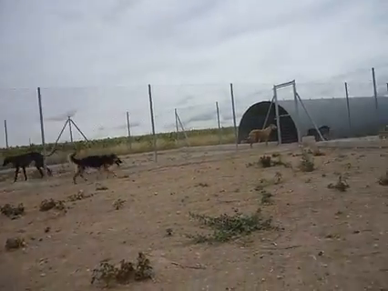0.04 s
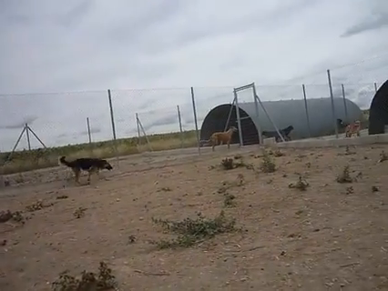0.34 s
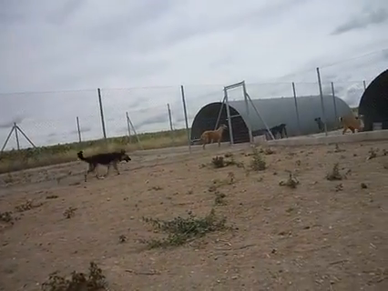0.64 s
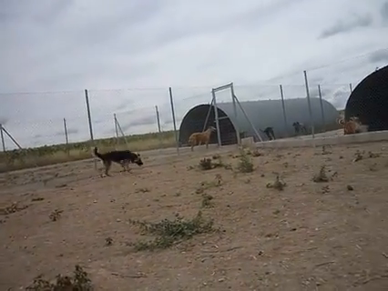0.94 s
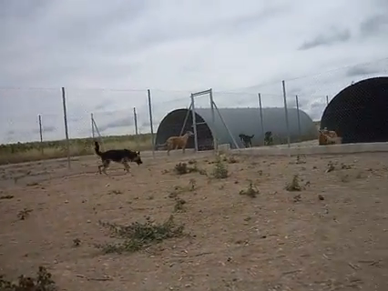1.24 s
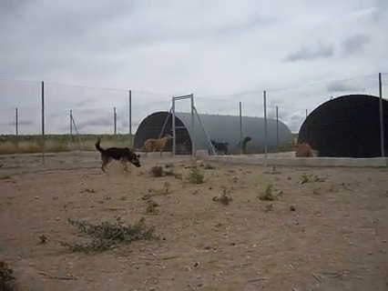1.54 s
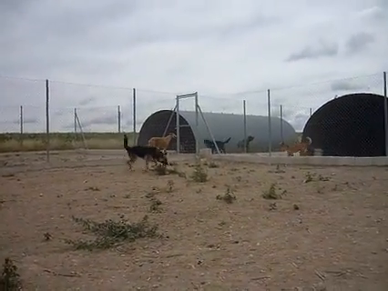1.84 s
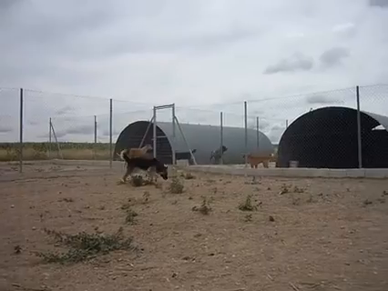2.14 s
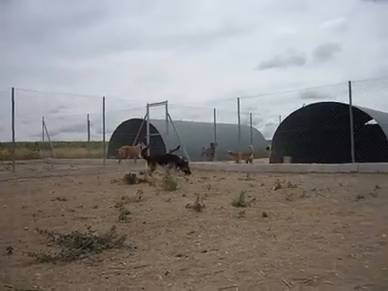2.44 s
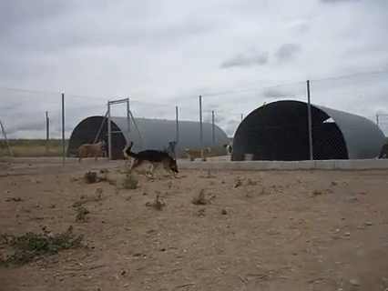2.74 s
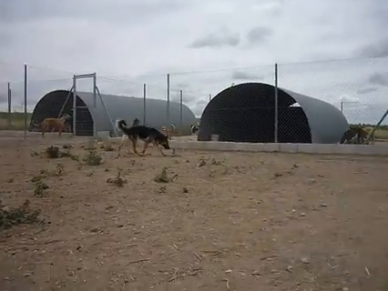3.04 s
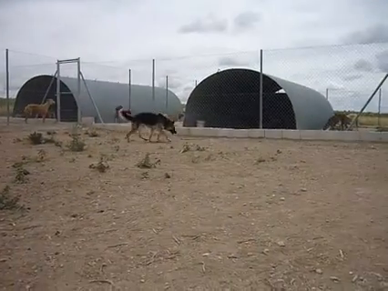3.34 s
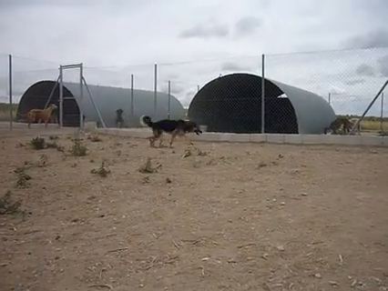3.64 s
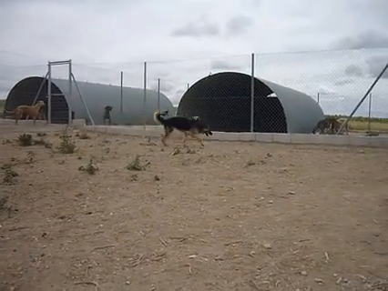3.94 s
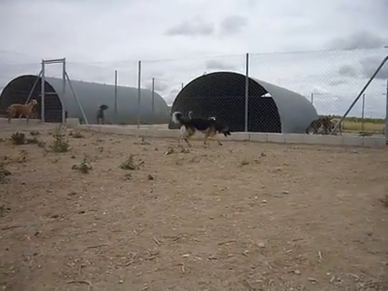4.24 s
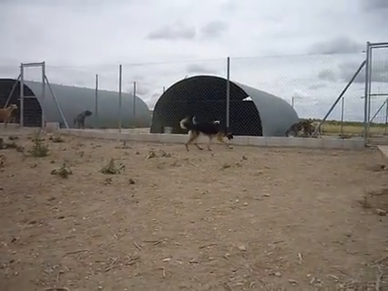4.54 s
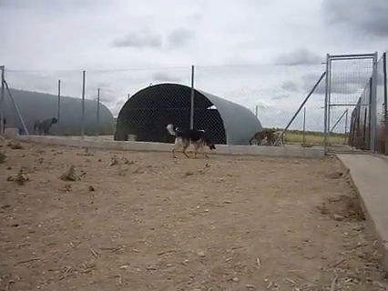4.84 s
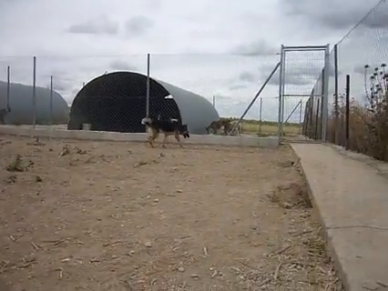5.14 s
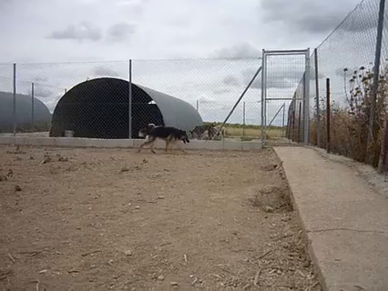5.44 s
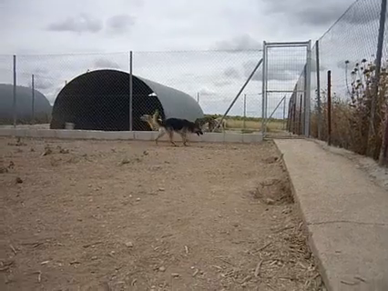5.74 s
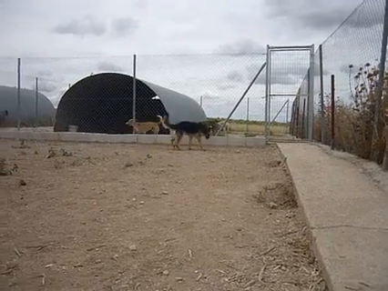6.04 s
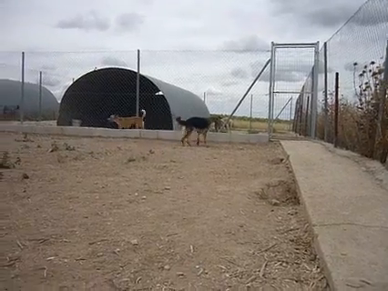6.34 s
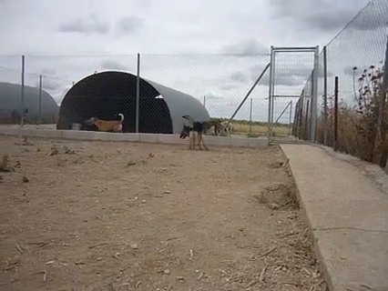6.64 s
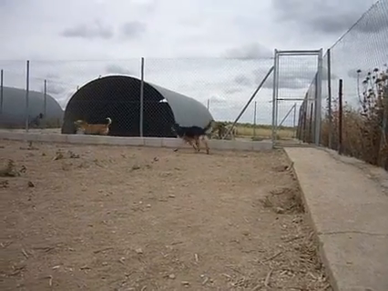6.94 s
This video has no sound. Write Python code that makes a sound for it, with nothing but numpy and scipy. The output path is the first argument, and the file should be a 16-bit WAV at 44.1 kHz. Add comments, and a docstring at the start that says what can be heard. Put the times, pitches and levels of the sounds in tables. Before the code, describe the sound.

A nearby dog yaps repeatedly outdoors while others answer with lower barks and distant yelps over faint hiss.

```python
"""An open dirt yard with metal shelters, across which dogs call. A near dog yaps in clean arches of pitch,
a second answers lower, a big one gives two gruff barks, another yelps far off and others whine faintly.
Each voice is a source and a filter: vocal folds and puffs of breath excite the resonances of the throat.
The shelters throw the near calls back. Under them lie faint outdoor air, microphone hiss, two scuffs on
the dirt and three soft bumps on the camera."""
import sys
import numpy as np
from scipy import signal
from scipy.fft import rfft, irfft
from scipy.io import wavfile

SR = 44100
rng = np.random.default_rng(int(sys.argv[2]) if len(sys.argv) > 2 else 0)


def unload_audio(sound):
    """Save the sound as a 16-bit wav file, at the path given as the first command line argument."""
    columns = np.transpose(np.atleast_2d(sound))
    # keep every value between -1 and 1, then stretch to whole-number steps
    steps = np.round(np.clip(columns, -1, 1) * 32767)
    wavfile.write(sys.argv[1], SR, steps.astype(np.int16))


N = 317520

# spectrum of the steady hiss: f/Hz, relative level/dB
HISS_SPECTRUM = [(30, -15), (70, -13), (110, -5.5), (200, -2.5), (400, -5), (700, -7), (1200, -13),
                 (2000, -15.5), (3200, -19), (4800, -23), (6500, -22.5), (8400, -27.5)]
# bumps on the camera: t/s, f/Hz, level/dB, decay time/s
CAMERA_BUMPS = [(3.276, 140, -40, .0056), (3.703, 130, -43, .0093), (6.792, 168, -40, .011)]
# scuffs on the dirt: t/s, duration/s, level/dB
DIRT_SCUFFS = [(6.081, 0.114, -60), (6.174, 0.064, -61)]
# reflections from ground, wall and shelters: delay/s, relative level/dB
REFLECTIONS = [(0.0093, -34), (.027, -16.5), (.066, -19.5), (.081, -30.5)]
# their gain as the camera turns toward the big shelter: t/s, gain/dB
REFLECTION_GAIN = [(0, 2.5), (3, -4), (4.2, -2.5), (4.55, 2.5), (6, 2)]
# throat responses of the whining, yelping, big and near dogs, the first two dulled by distance:
# f/Hz, gain/dB
WHINE_TRACT = [(200, -16), (350, -8), (700, -16.5), (2000, -43), (8000, -66)]
YELP_TRACT = [(250, -44), (450, -9.5), (620, 6), (780, 8), (980, 1), (1200, -15), (1550, -19), (2000, -28),
              (3000, -43), (4100, -27), (5000, -49), (8000, -59.5)]
GRUFF_TRACT = [(200, -15), (340, 15.5), (500, 12), (680, 8.5), (880, 9.5), (1150, -3.5), (1500, -8.5),
               (2000, -24.5), (2600, -11), (3300, -32), (4700, -30), (5700, -23.5), (8000, -52.5)]
YAP_TRACT = [(400, 4), (800, 15.5), (1300, 5.5), (1750, 0), (2050, -5), (2350, -8), (2950, -10.5),
             (3300, -12), (3700, -8.5), (4050, -15), (4450, -14), (4800, -17.5), (5500, -16.5),
             (6500, -23.5), (8000, -31)]
# filter for breath passing the teeth: f/Hz, gain/dB
TEETH_RESPONSE = [(300, -60), (2200, -29.5), (3200, -17), (4200, -5), (4850, -1), (5500, 5), (6300, -4.5),
                  (8000, -1.5)]
# distant whines: start/s, end/s, first pitch/Hz, last pitch/Hz, level/dB
FAR_WHINES = [(.17, .42, 305, 350, -51), (.45, .7, 255, 300, -55), (.93, 1.17, 285, 345, -54),
              (1.97, 2.13, 325, 355, -54)]
# far yelps: start/s, break/s, end/s, cry pitch/Hz, note pitch/Hz, cry glide/fraction of pitch,
# cry level/dB, cry fade/dB (negative swells), note level/dB, roughness (0-1), jaw resonance/dB,
# accent time/s, accent/dB, huff level/dB
FAR_YELPS = [(0.089, 0.161, .233, 474, 388.5, 0.077, -45, -2, -46, 0.34, 4, .125, 2, -58),
             (0.413, 0.507, .6, 367.7, 371.4, -0.0048, -45, 1, -48.5, 0.44, -15, .5, 5, -62),
             (1.072, 1.138, 1.18, 487, 385, -.019, -43, -1, -41.5, 0.31, -8, 1.1, 4, -58),
             (1.613, 1.661, 1.715, 470.4, 397, 0.014, -42.5, 5.5, -44.5, 0.16, -10, 1.622, 1, -61),
             (1.972, 2.026, 2.12, 441, 393.4, -0.077, -47.5, -2.5, -39, 0.31, 8, 1.988, 1.7, -52),
             (2.415, 2.502, 2.551, 465, 362.4, 0.024, -48.5, -0.5, -42, 0.69, 5, 2.455, 1.9, -62),
             (2.844, 2.93, 2.991, 460, 376, 0.035, -49.5, -8.5, -38, 0.49, 6.5, 2.882, 6, -60.5),
             (3.262, 3.335, 3.398, 437, 379, -0.027, -42, 3.5, -45, 0.38, 7.5, 3.342, 4.5, -54.5),
             (4.29, 4.334, 4.415, 424, 403.3, -0.03, -55.5, -11, -41.5, 0.13, 6.5, 4.385, 6.5, -58),
             (4.683, 4.761, 4.821, 466.5, 387.5, 0.046, -39, 7.5, -44.5, 0.15, -3, 4.704, 7, -52.5),
             (5.137, 5.233, 5.281, 460.6, 389.5, 0.067, -45.5, 3.5, -48, 0.4, 6.5, 5.18, 2.5, -57),
             (5.625, 5.686, 5.722, 405, 384.4, -0.0082, -54, -10, -43, .45, 15, 5.703, 3, -53.5),
             (6.932, 6.987, 7.09, 450, 388, 0.015, -64, -7, -55, 0.83, 23.5, 7.02, 1, -62),
             (7.111, 7.141, 7.22, 420, 310.3, 0, -52, 5, -49.5, .88, 16, 7.18, 0, -60)]
# gruff barks, one path of points each: t/s, pitch/Hz, level/dB, jaw resonance/dB
GRUFF_PATHS = [
    [(1.236, 402, -54, 5), (1.25, 409.6, -46, 9), (1.257, 423.3, -35, 3), (1.286, 417, -34.5, 5.5),
     (1.297, 409, -45, 10.5), (1.31, 397.3, -37, 4), (1.335, 386, -36, 1.5), (1.355, 331, -38, -5),
     (1.378, 320, -47, -10)],
    [(1.738, 449.4, -53, 8), (1.765, 493.6, -40.5, 12), (1.78, 505, -35.5, 5), (1.796, 502, -27.5, -0.5),
     (1.826, 463.7, -30.5, 1), (1.836, 432, -41.5, -3), (1.848, 384, -35, -10), (1.864, 362, -37, -22),
     (1.876, 352, -46.5, -22), (1.895, 320, -58, -21)],
]
# near yaps: top of the arch/s, lead-in/s, top pitch/Hz, rise/s, fall/s, base roughness (0-1),
# fundamental/dB, second harmonic/dB, its dip/dB, overtones/dB, their edge above 2 kHz/dB,
# edge fade/(dB/s), muzzle ring/dB, shrill resonance/dB, jaw ring on the climb/dB, rising flare/dB,
# falling flare/dB, pop/dB, hiss/dB
NEAR_YAPS = [(.752, 0.096, 583.4, 0.094, 0.085, 0.32, -37, -42, 7, -52, 7, -7.5, -4.5, -5, 7, 8, 10, 1.5, -57.5),
             (1.069, 0.085, 577.4, 0.099, 0.08, 0.32, -33.5, -41.5, 6.5, -52.5, 0, 79, 4, -2, 9.5, 5.5, 2, 7, -67),
             (1.275, 0.068, 446.4, .17, 0.22, 0.24, -38.5, -42.5, 0, -56.5, -5, 47, -12.5, 10.5, 7.5, -3, 1, 12, -61),
             (1.382, 0.064, 585.4, .1, .082, 0.32, -34, -41.5, 11, -55.5, -1.5, 109, 0.5, 1, 9, 9, -1, 2, -63.5),
             (1.59, .056, 437, .16, 0.17, 0.38, -41.5, -46, -11.5, -58, -17, 43, 2, 18.5, 7, 0, -3.5, 6, -70.5),
             (2.277, 0.1, 615.5, 0.11, 0.085, 0.3, -34, -39.5, 1.5, -53.5, 0.5, 69, 2, 1, 7, 9, 3, -7, -61.5),
             (2.591, 0.084, 584, 0.1, 0.092, 0.26, -35, -43, 4.5, -53.5, -1.5, 84, 2.5, 7, 10, 4.5, 3.5, 5, -63.5),
             (2.981, .075, 586, 0.12, .088, .2, -33, -42.5, 6, -54, -0.5, 77, 4, 11.5, 8, 7, -1, 4.5, -56),
             (3.19, .062, 459.5, .1, 0.216, 0.25, -36.5, -44, -7, -51.5, -5, 40, -12, 5, 3.5, 4, 6, 3, -64.5),
             (3.648, 0.05, 439, .1, 0.23, 0.14, -41.5, -42, 0.5, -51.5, -10, 30.5, 1, 17, 7.5, 2, 3.5, 8, -65),
             (4.128, .087, 614.5, 0.099, 0.075, 0.12, -38, -39, -.5, -46, -4, 15, 8.5, 5, 7, 9.5, 11, 0.5, -54.5),
             (4.521, 0.094, 581, .11, 0.073, 0.08, -35, -38, -2, -49.5, -1, 40, 6.5, 3, 4.5, 9.5, 3, 3, -62.5),
             (5.769, 0.084, 575, 0.088, 0.078, 0.2, -42, -43, 0, -50.5, 1.5, 23, -2, 0, 6, 8, 13.5, -4, -57)]

# resonances: centre/Hz, width/Hz
LOW_THROAT, HOLLOW, HUFF = (770, 70), (1780, 150), (1270, 320)
OPEN_JAW, HALF_OPEN_JAW = (1850, 485), (2120, 330)
MUZZLE_RING, MUZZLE_RASP, MUZZLE_SHRILL = (3660, 200), (5300, 940), (5600, 900)


def gain_of(db):
    """Amplitude ratio of a level in decibels."""
    return 10 ** (np.asarray(db) / 20)


def unit_rms(x):
    """Normalisation to unit mean power."""
    return x / np.sqrt(np.mean(x ** 2) + 1e-20)


def hump(x, centre, width):
    """Gaussian curve, one at its centre."""
    return np.exp(-((x - centre) / width) ** 2)


def response(spectrum, hz):
    """Gain of a (f/Hz, gain/dB) curve, interpolated in log frequency."""
    f, db = np.transpose(spectrum)
    return gain_of(np.interp(np.log(hz + 1), np.log(f + 1), db))


def coloured(x, spectrum):
    """Linear filtering by a (f/Hz, gain/dB) curve."""
    return irfft(rfft(x) * response(spectrum, np.fft.rfftfreq(len(x), 1 / SR)), len(x))


def band(x, centre_hz, width_hz):
    """Band-pass filtering: the part of x inside one resonance."""
    return irfft(rfft(x) * hump(np.fft.rfftfreq(len(x), 1 / SR), centre_hz, width_hz), len(x))


def wander(size, hz):
    """Random modulation: noise of about unit rms, low-passed at hz."""
    padded = size + SR // 4
    f = np.fft.rfftfreq(padded, 1 / SR)
    return unit_rms(irfft(rfft(rng.standard_normal(padded)) / (1 + (f / hz) ** 4)))[:size]


def swelled(x, rise_s, fall_s):
    """Amplitude envelope with a quarter-sine attack and release."""
    t = np.arange(len(x)) / SR
    attack = np.sin(np.pi / 2 * np.minimum(t / rise_s, 1))
    release = np.sin(np.pi / 2 * np.minimum(t[::-1] / fall_s, 1))
    return x * attack * release


def add(mix, start_s, sound):
    """Superposition of a sound on the mix."""
    part = mix[round(start_s * SR):][:len(sound)]
    part += sound[:len(part)]


def air(hiss_db=-53.5):
    """Broadband noise: steady hiss, and a low murmur of wind that swells a little and slowly drops."""
    hiss = gain_of(hiss_db) * unit_rms(coloured(rng.standard_normal(N), HISS_SPECTRUM))
    wind_spectrum = [(40, -32.5), (150, -4.5), (280, 2.5), (600, -10.5), (2000, -47), (8000, -68)]
    wind = unit_rms(coloured(rng.standard_normal(N), wind_spectrum))
    trend_db = np.interp(np.arange(N) / SR, [0, 2, 4, 7.2], [-64, -59.5, -67.5, -68.5])
    return hiss + wind * gain_of(trend_db + 2.5 * wander(N, 5))


def bumps():
    """Damped oscillation: each knock excites one low mode of the camera body."""
    out, t = np.zeros(N), np.arange(SR // 10) / SR
    for start, hz, db, decay in CAMERA_BUMPS:
        add(out, start, gain_of(db) * np.sin(2 * np.pi * hz * t) * np.exp(-t / decay))
    return out


def scuffs(grains_per_s=1500):
    """Shot noise: grit crunches underfoot as a train of random impulses."""
    out = np.zeros(N)
    for start, duration, db in DIRT_SCUFFS:
        size = round(duration * SR)
        grit = rng.standard_normal(size) * (rng.random(size) < grains_per_s / SR)
        crunch = unit_rms(band(grit, centre_hz=1800, width_hz=1800))
        add(out, start, gain_of(db) * swelled(crunch, rise_s=.038, fall_s=.04))
    return out


def reverberation(x, t60, dull_hz, taps_per_s=2500):
    """Diffuse reflection from fences and sheds: sparse, dull echoes of random sign decay exponentially."""
    t = np.arange(SR) / SR
    taps = rng.choice([-1., 1.], SR) * (rng.random(SR) < taps_per_s / SR)
    taps *= (t > .006) * gain_of(-60 * t / t60)
    pole = np.exp(-2 * np.pi * dull_hz / SR)
    tail = signal.lfilter([1 - pole], [1, -pole], taps / np.linalg.norm(taps))
    return signal.fftconvolve(x, tail)[:N]


def echoes(x):
    """Specular reflection: hard faces around the yard return delayed copies, the middle tones best."""
    out = np.zeros(N)
    for delay, db in REFLECTIONS:
        add(out, delay, gain_of(db) * x)
    out *= gain_of(np.interp(np.arange(N) / SR, *np.transpose(REFLECTION_GAIN)))
    return coloured(out, [(300, 2.5), (600, 4.5), (1150, 0), (1750, 4), (2600, -7), (6000, -17)])


def folds(hz, rough, tract, jitter, jitter_hz):
    """Glottal source: jittered harmonics, their frequencies, and air puffed once a cycle into the tract."""
    k = np.arange(1, 22)[:, None]
    cycles = np.cumsum(hz * (1 + jitter * rough * wander(len(hz), jitter_hz))) / SR
    puffs = (1 + 1.2 * np.cos(2 * np.pi * cycles)) * rng.standard_normal(len(hz))
    harmonics = np.sqrt(2) * np.cos(2 * np.pi * k * cycles + np.sqrt(k) * np.pi)
    breath = unit_rms(coloured(puffs, [(100, -44), (250, -21)] + list(tract[1:])))
    return harmonics, k * hz, breath


def call(path, tract):
    """Source-filter voice along a path of t/s, pitch/Hz, level/dB, roughness (0-1), jaw resonance/dB."""
    times, *columns = np.transpose(path)
    t = np.arange(times[0], times[-1], 1 / SR)
    hz, db, rough, jaw_db = (np.interp(t, times, column) for column in columns)
    rough = np.clip(rough, 0, 1)
    harmonics, partial_hz, breath = folds(hz, rough, tract, jitter=.1202, jitter_hz=156.5)
    weight = response(tract, partial_hz)
    tone = (weight * harmonics).sum(0) / np.linalg.norm(weight, axis=0)
    tone *= 1 + .61 * rough * wander(len(t), 140)  # shimmer
    voice = np.sqrt(1 - rough ** 2) * tone + rough ** 1.2 * breath
    voice += (gain_of(jaw_db) - 1) * band(voice, *OPEN_JAW)
    return times[0], swelled(gain_of(db) * voice, rise_s=.012, fall_s=.012)


def whine(row, rough=.05, fade_db=7):
    """Nearly periodic vibration of the folds: a soft rising tone that swells and fades."""
    start, end, first_hz, last_hz, db = row
    path = [(start, first_hz, db - fade_db),
            ((start + end) / 2, (first_hz + 3 * last_hz) / 4, db),
            (end, last_hz, db - fade_db)]
    return call([(*point, rough, 0) for point in path], WHINE_TRACT)


def huff(size, resonance):
    """Turbulent noise: a puff of air through one resonance of the muzzle."""
    return swelled(unit_rms(band(rng.standard_normal(size), *resonance)), rise_s=.0084, fall_s=.1)


def yelp(row, break_s=.0089, sag_per_s=.7, catch_db=7, note_fade_db=2):
    """Register break: a hoarse cry catches and jumps to a cleaner, usually lower note."""
    (start, split, end, cry_hz, note_hz, glide, cry_db, cry_fade_db, note_db,
     rough, jaw_db, accent_s, accent_db) = row
    t = np.linspace(start, end, 80)
    corners = [start, split - break_s / 2, split + break_s / 2, end]
    sag = sag_per_s * (end - split) / 2
    corner_hz = [cry_hz * (1 - glide), cry_hz * (1 + glide), note_hz * (1 + sag), note_hz * (1 - sag)]
    hz = np.interp(t, corners, corner_hz)
    hz *= 1 + .25 * np.exp((start - t) / .01)  # slides onto its pitch from above
    clear_db = accent_db * hump(t, accent_s, .009)  # an accent is a moment of clear voice
    db = np.interp(t, corners, [cry_db, cry_db - cry_fade_db, note_db, note_db - note_fade_db])
    db += clear_db - catch_db * hump(t, split, break_s / 3)
    note_rough = rough ** 2.07
    hoarse = np.interp(t, corners, [rough, rough, note_rough, note_rough]) * gain_of(-clear_db)
    _, voice = call(list(zip(t, hz, db, hoarse, np.full(len(t), jaw_db))), YELP_TRACT)
    ragged_db = 1.8 * wander(len(voice), 60)
    return start, voice * gain_of(ragged_db)


def snarl(size, first_hz=1800, last_hz=850, width_hz=440):
    """Formant glide: a burst of turbulence through a resonance that falls as the jaw closes."""
    carrier = np.exp(2j * np.pi * np.cumsum(np.linspace(first_hz, last_hz, size)) / SR)
    noise = (carrier * (wander(size, width_hz / 2) + 1j * wander(size, width_hz / 2))).real
    return swelled(noise * hump(np.arange(size) / SR, .052, .034), rise_s=.015, fall_s=.02)


def gruff_bark(path, cycles_per_throb=4.5, mid_rough=.3, mid_depth=.5):
    """Subharmonic modulation: loose throat flesh chops the voice to a growl, clearing as the jaw shuts."""
    times, hz, db, jaw_db = np.transpose(path)
    progress = (times - times[0]) / (times[-1] - times[0])
    rough = np.interp(progress, [0, .5, .75], [.55, mid_rough, .06])
    start, voice = call(list(zip(times, hz, db, rough, jaw_db)), GRUFF_TRACT)
    size = len(voice)
    t = start + np.arange(size) / SR
    throb_hz = np.interp(t, times, hz) / cycles_per_throb * (1 + .06 * wander(size, 60))
    depth = mid_depth * np.interp(t, times, rough) / mid_rough
    growl = (1 + depth * np.cos(2 * np.pi * np.cumsum(throb_hz) / SR)) / np.sqrt(1 + depth ** 2 / 2)
    sound = growl * (voice + gain_of(-40.5) * snarl(size) + gain_of(-76) * huff(size, MUZZLE_RASP))
    return start, coloured(sound, [(200, -12), (330, 0)])  # the mouth radiates little below the voice


def yap(row, slack_pitch=.52, wobble=.018, swell_db=28, shut_db_per_s=150, breath_db=8):
    """Fold tension sets pitch: it arches, clean when taut, and sweeps the harmonics through resonances."""
    (top_s, lead, top_hz, rise, fall, rough, first_db, second_db, dip_db, overtone_db, edge_db,
     edge_fade, ring_db, shrill_db, climb_db, rise_flare_db, fall_flare_db, pop_db, hiss_db) = row
    t = np.arange(-lead, .074, 1 / SR)  # zero at the top of the arch
    size = len(t)
    arch = hump(t, 0, np.where(t < 0, rise, fall))
    slack = np.minimum(2 * (1 - arch), 1)
    hz = top_hz * (arch ** 6 + slack_pitch ** 6) ** (1 / 6)  # slack folds bottom out
    hz *= 1 + wobble * (.5 + 2 * slack) * wander(size, 36)
    crack = hump(t, .036, .014)  # the voice cracks on the way down
    rough = rough + .5 * slack ** 3 + .25 * crack
    harmonics, partial_hz, breath = folds(hz, rough, YAP_TRACT, jitter=.036, jitter_hz=124)
    # the fundamental swells, later when the pitch falls slowly, then briefly gives way
    swell_s = .004 + .13 * (fall - rise)
    give_db = 2.5 * hump(t, swell_s + .033, .0092)
    first_gain = gain_of(first_db - swell_db * (1 - hump(t, swell_s, .058)) - give_db)
    # the second harmonic flares in the lowest resonance, dips just after the top, then pops
    flare_db = np.where(t < 0, rise_flare_db, fall_flare_db) * hump(partial_hz[1], *LOW_THROAT)
    dip, pop = hump(t, .004, .018), hump(t, .026, .0092)
    shut_db = shut_db_per_s * np.maximum(t - .032, 0)  # the closing mouth damps all overtones
    second_gain = gain_of(second_db - dip_db * dip - shut_db - 10 * slack + flare_db + pop_db * pop)
    # higher overtones need taut folds and light up in the resonances of jaw and muzzle
    overtone_gain = gain_of(overtone_db - shut_db - 17 * slack ** 2)
    treble = 1 / (1 + (2000 / partial_hz) ** 16)
    colour_db = (treble * (edge_db - edge_fade * t - 22 * slack ** 2)
                 + ring_db * hump(partial_hz, *MUZZLE_RING)
                 + (shrill_db + 2 * crack) * hump(partial_hz, *MUZZLE_SHRILL)
                 - 2.5 * dip * hump(partial_hz, *HOLLOW)
                 + climb_db * hump(t, -.031, .022) * hump(partial_hz, *HALF_OPEN_JAW))
    # they flutter as the head moves; the highest break into rasp, more so from near the top
    flutter_db = 3.2 * np.array([wander(size, 35) for _ in harmonics])
    weight = response(YAP_TRACT, partial_hz) * gain_of(colour_db + flutter_db)
    rasp_hz = np.interp(t, [-.03, .005], [7400, 5600])
    rasp = np.clip((partial_hz / rasp_hz) ** 6, 0, .75)
    harmonics *= np.sqrt(1 - rasp ** 2) + rasp * np.array([wander(size, 220) for _ in harmonics])
    voice = first_gain * harmonics[0]
    voice += second_gain * gain_of(1.5 * wander(size, 30)) * harmonics[1]
    voice += overtone_gain * ((weight * harmonics)[2:].sum(0) + gain_of(breath_db) * rough * breath)
    # air hisses past the teeth at the height of the effort
    spurts = gain_of(hiss_db + 3 * wander(size, 70)) * hump(t, .004, .028)
    voice += spurts * unit_rms(coloured(breath, TEETH_RESPONSE))
    voice *= gain_of(2.6 * rough * wander(size, 70))  # slack folds also shake in loudness
    return top_s - lead, swelled(voice, rise_s=.024, fall_s=.014)


def scene():
    """Reflection: near dogs have distinct echoes and a long faint tail, far dogs a short, dull tail."""
    near, far = np.zeros(N), np.zeros(N)
    for row in NEAR_YAPS:
        add(near, *yap(row))
    for path in GRUFF_PATHS:
        add(near, *gruff_bark(path))
    for *row, huff_db in FAR_YELPS:
        start, cry = yelp(row)
        add(far, start, cry)
        add(far, start - .018, gain_of(huff_db) * huff(SR // 10, HUFF))  # a huff opens each yelp
    for row in FAR_WHINES:
        add(far, *whine(row))
    near = near + echoes(near) + gain_of(-16) * reverberation(near, t60=.81, dull_hz=3460)
    far = far + gain_of(-10.5) * reverberation(far, t60=.44, dull_hz=3000)
    return (near + far + air() + bumps() + scuffs())[None]


def record(dry, offset=-.073, cutoff_hz=8150):
    """DC offset and band limiting: the small camera's converter rests off centre and loses high treble."""
    low_pass = signal.firwin(161, cutoff_hz, window=("kaiser", 8), fs=SR)
    return signal.oaconvolve(dry + offset, low_pass[None], "same")


dry = scene()
out = record(dry)
unload_audio(out)
```